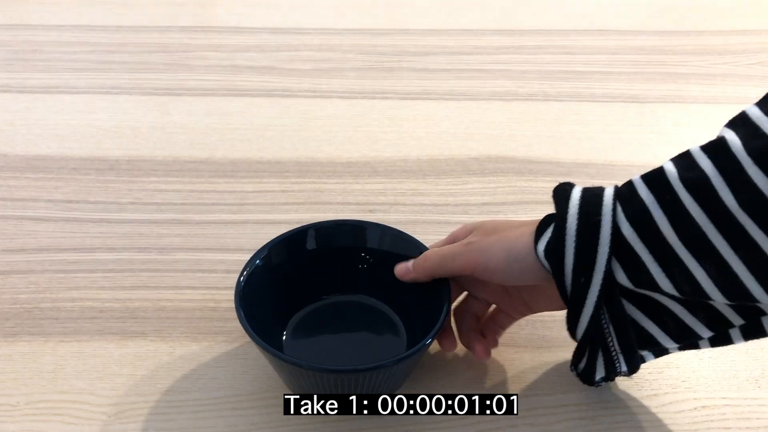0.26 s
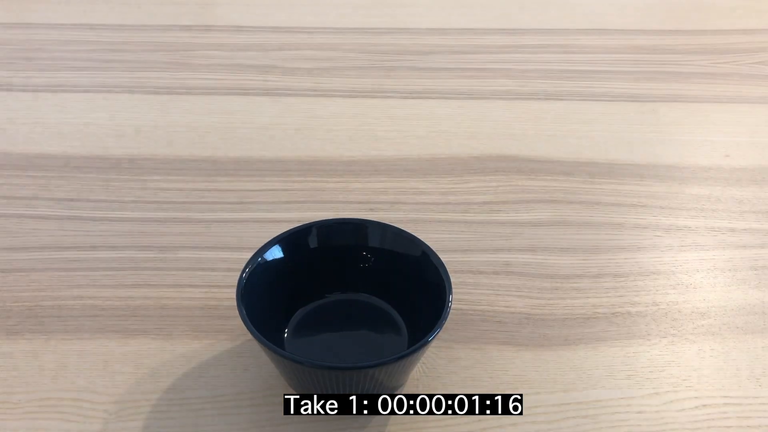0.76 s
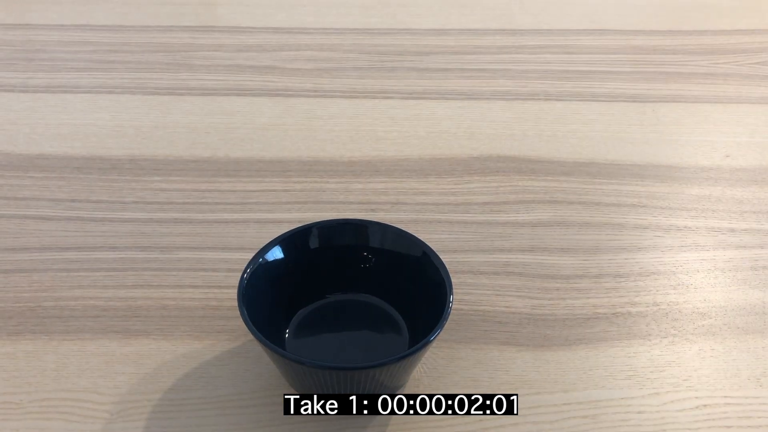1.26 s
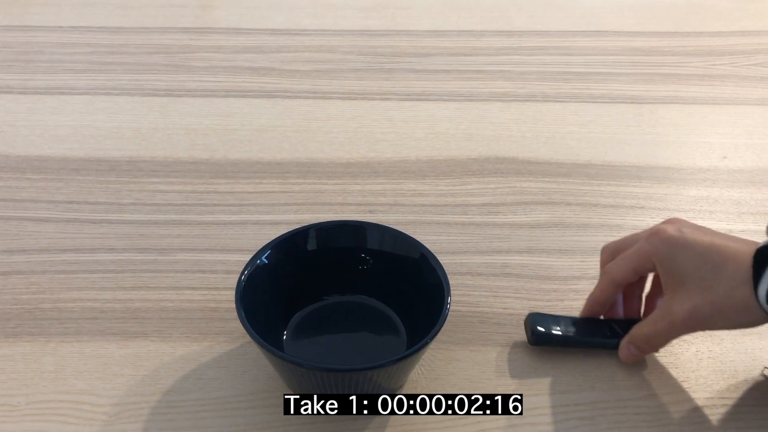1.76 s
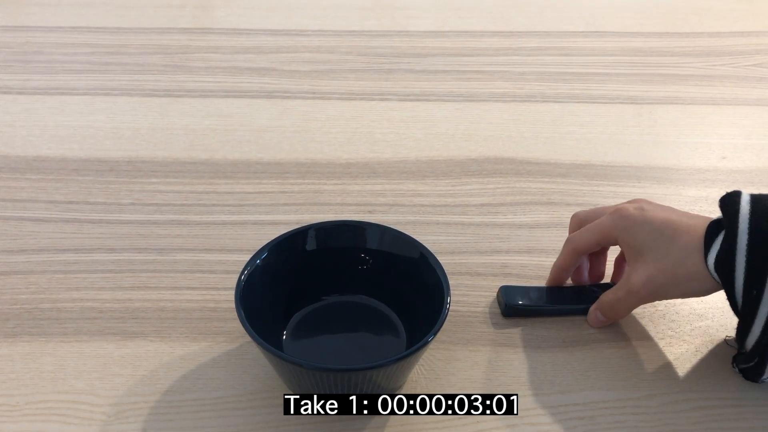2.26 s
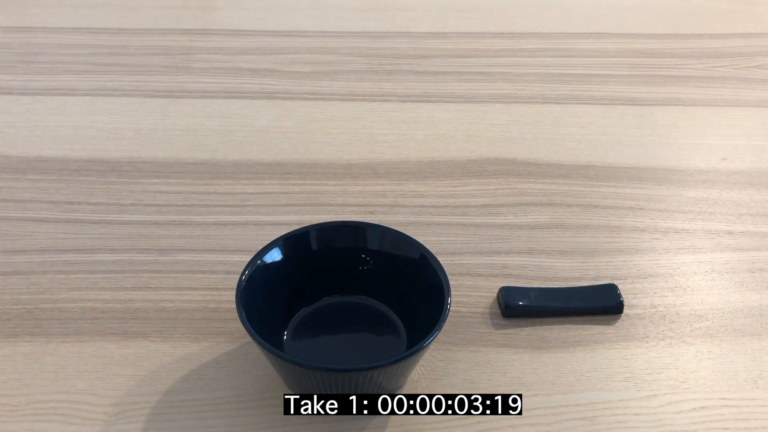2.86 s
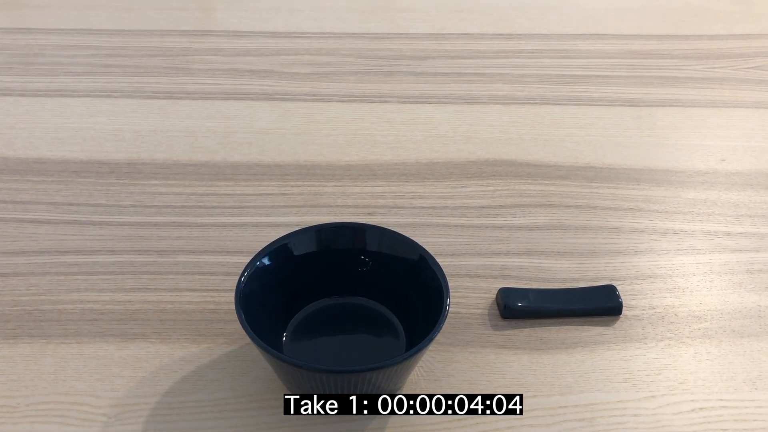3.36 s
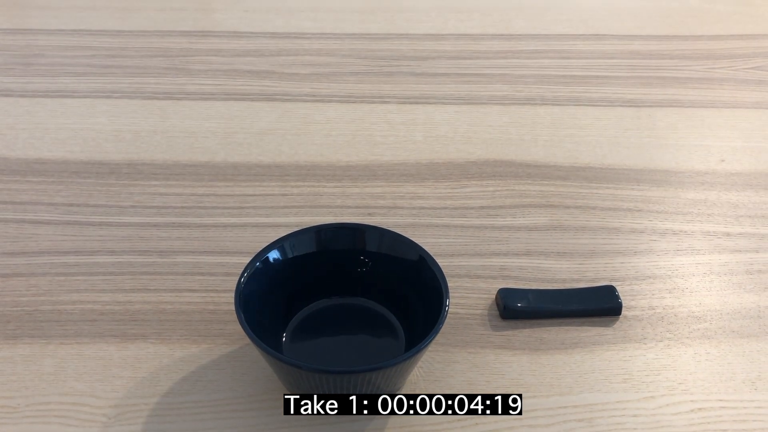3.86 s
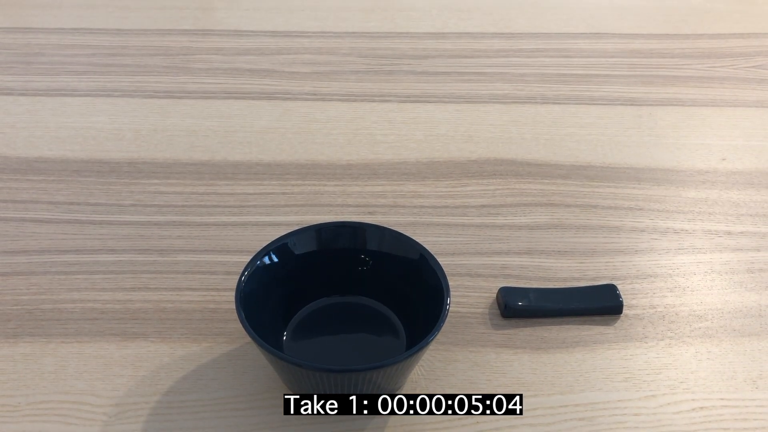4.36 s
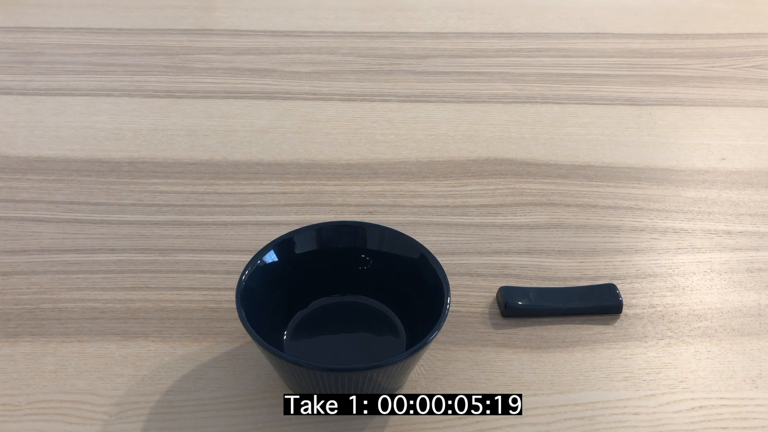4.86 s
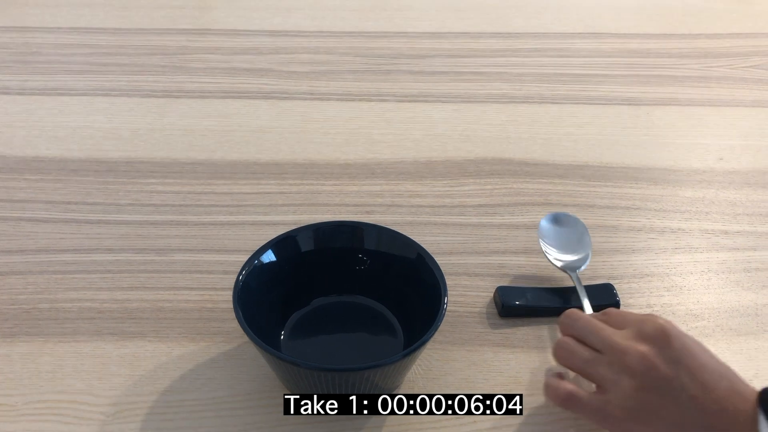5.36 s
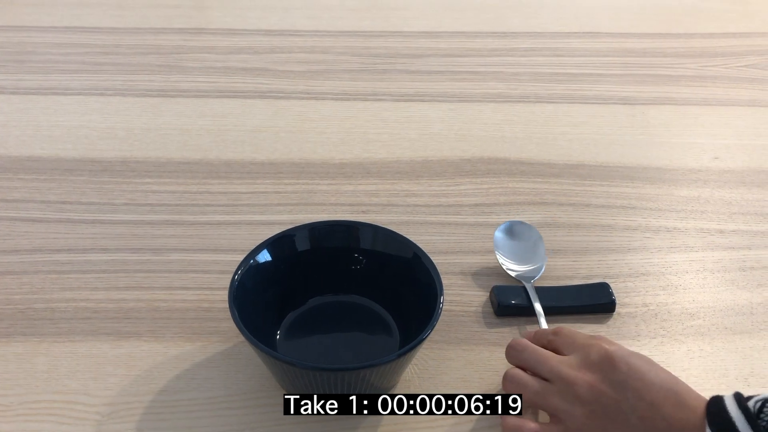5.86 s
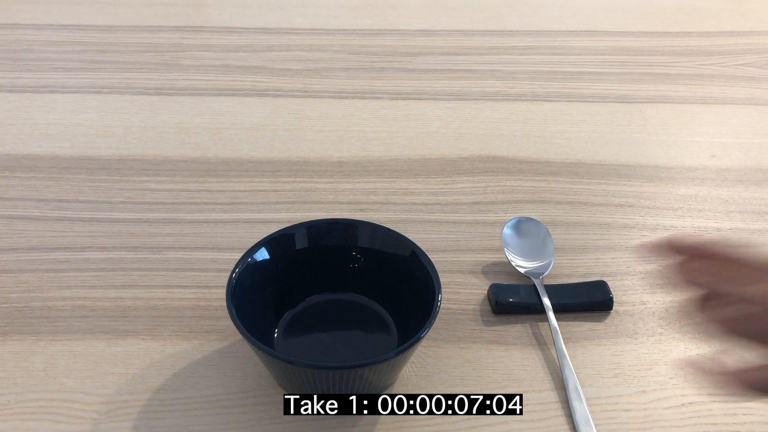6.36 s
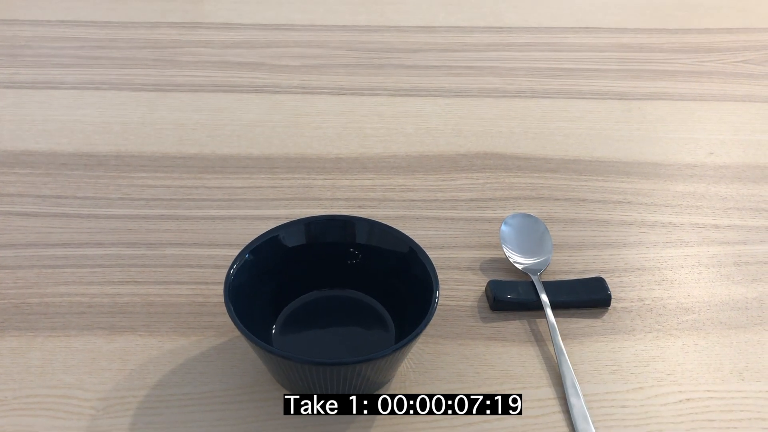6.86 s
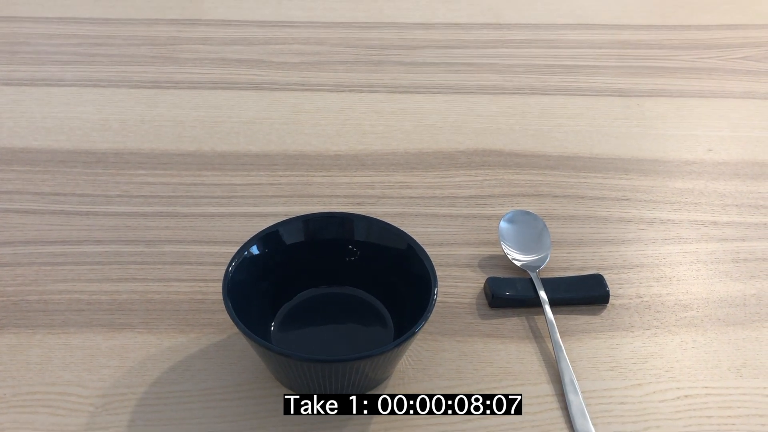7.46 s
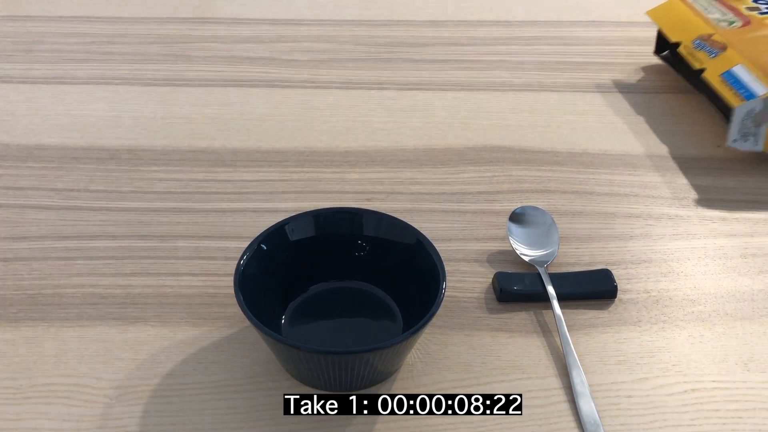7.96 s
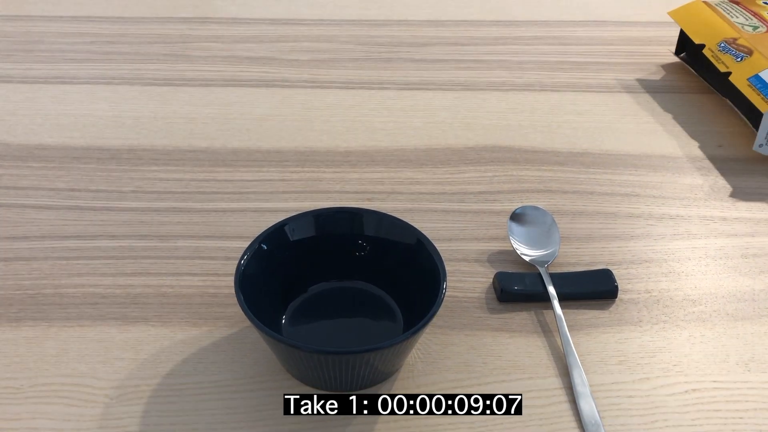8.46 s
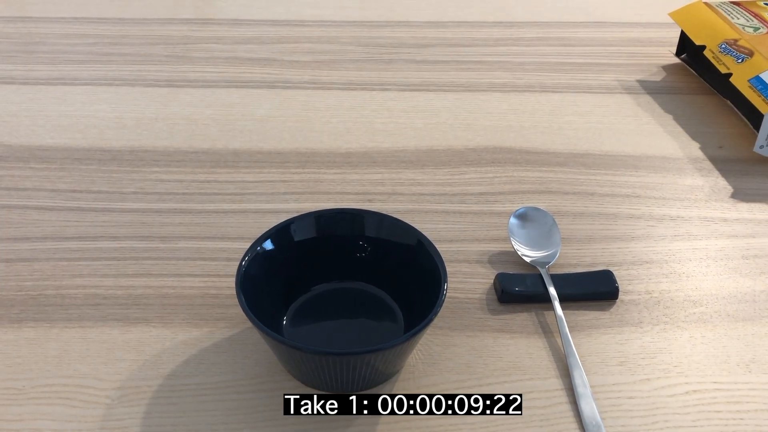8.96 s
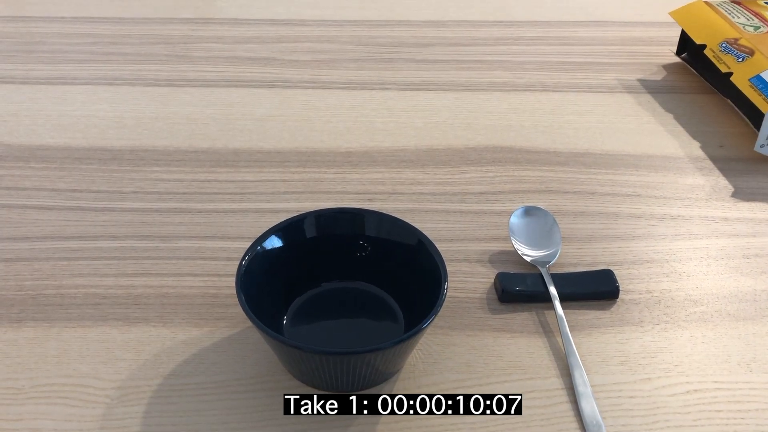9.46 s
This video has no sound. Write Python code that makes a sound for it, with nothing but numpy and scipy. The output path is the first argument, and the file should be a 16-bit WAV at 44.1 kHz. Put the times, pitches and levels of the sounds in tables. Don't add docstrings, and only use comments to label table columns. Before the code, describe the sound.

Tableware is set down on wood in a quiet room, with knocks and steely ticks, followed by cardboard dragging, hollow bumps and sharp bag crackles.

```python
import sys
import numpy as np
from scipy import signal
from scipy.fft import rfft, irfft, next_fast_len
from scipy.io import wavfile
from scipy.ndimage import uniform_filter1d

SR = 44100
rng = np.random.default_rng(int(sys.argv[2]) if len(sys.argv) > 2 else 0)


def volts(x):
    e = np.asarray(x, float) / 20
    return 10 ** e


def digitize_waveform(pressure):
    field = np.atleast_2d(pressure).T
    bounded = np.clip(field, -1, 1)
    quanta = np.round(bounded * 32767).astype(np.int16)
    wavfile.write(sys.argv[1], SR, quanta)


N = 427769
ONSET_S = 0.0008


def lookup(table, hz):
    f, v = np.transpose(table)
    return np.interp(np.log(np.maximum(hz, 1)), np.log(f), v)


def colour(x, table):
    n = next_fast_len(len(x) + 4096)
    gain = volts(lookup(table, np.fft.rfftfreq(8192, 1 / SR)))
    cepstrum = irfft(np.log(gain))[:4096]
    cepstrum[1:] *= 2
    impulse = irfft(np.exp(rfft(cepstrum, 8192)))[:4096]
    return irfft(rfft(x, n) * rfft(impulse, n), n)[:len(x)]


def band(x, lo_hz, hi_hz):
    return signal.lfilter(*signal.butter(2, [lo_hz, min(hi_hz, SR * 0.49)], "band", fs=SR), x)


def unit(x):
    return x / np.sqrt(np.mean(x ** 2))


def fade(t, t60):
    return 10 ** (-3 * t / t60)


def ring(x, modes, spread_db=0.0):
    out = 0
    share = volts(spread_db * rng.standard_normal(len(modes))) * rng.choice([-1, 1], len(modes))
    for (hz, db, t60), g in zip(modes, share):
        pole = np.exp(2j * np.pi * hz / SR) * fade(1 / SR, t60)
        resonance = signal.lfilter([0, pole.imag], [1, -2 * pole.real, abs(pole) ** 2], x)
        out = out + g * volts(db) * resonance
    return out


def cluster(modes):
    out = []
    for hz, db, t60 in modes:
        neighbour_db = db - (10 if hz < 4000 else 3)
        out.append((hz, db, t60))
        for shift in [0.022, 0.007] * rng.standard_normal(2):
            out.append((hz * (1 + shift), neighbour_db, 0.55 * t60))
    return out


def disperse(x, spread):
    phase = 2 * np.pi * spread * np.sqrt(np.fft.rfftfreq(len(x), 1 / SR))
    return irfft(rfft(x) * np.exp(-1j * phase), len(x))


def grains(per_s, spread_db, size=N):
    hits = (rng.random(size) < per_s / SR) * rng.choice([-1, 1], size)
    return unit(hits * volts(spread_db * rng.exponential(1, size)))


def walk(per_s):
    k = int(SR / per_s)
    return unit(uniform_filter1d(np.repeat(rng.standard_normal(N // k + 1), k), k)[:N])


def add(out, s, sound, db):
    i = int((s + ONSET_S) * SR)
    out[i:i + len(sound)] += (volts(db) * sound / np.abs(sound).max())[:N - i]


def curve(table):
    s, *columns = np.transpose(table)
    return [volts(np.interp(np.arange(N) / SR, s, c, -150, -150)) for c in columns]


def strokes(starts, holds, dbs, attack_s, sag_db_s, release_db_s):
    t, power = np.arange(N) / SR, np.zeros(N)
    for s, hold, db in zip(starts, holds, dbs):
        a = int((s - attack_s) * SR)
        age = t[a:a + SR // 2] - s
        fall_db = sag_db_s * np.clip(age, 0, hold) + release_db_s * np.maximum(age - hold, 0)
        rise = np.clip(1 + age / attack_s, 0, 1)
        power[a:a + SR // 2] += (volts(db - fall_db) * rise) ** 2
    return np.sqrt(power)


# frequency in Hz, t60 in seconds.
WOOD_T60 = [(100, 0.74), (260, 0.28), (700, 0.27), (1840, 0.066), (4850, 0.049)]


def knocks(events, tone, top, modes, wood_db, tilt_db, crack_s, top_db, chatter_s, spread):
    out, t = np.zeros(N), np.arange(SR // 2) / SR
    click = 1.0 * (t == 0)
    held = np.exp(-(t / 0.18) ** 4)
    for s, db, ring_db, click_db in events:
        wood = 0
        for hz in 70 * 2 ** np.arange(0, 8, 0.5):
            late = 1 - np.exp(-t * hz / 3.6)
            crack = fade(t, crack_s * (1000 / hz) ** 0.33)
            tail = volts(wood_db - tilt_db * np.log2(hz / 500)) * fade(t, lookup(WOOD_T60, hz))
            noise = band(rng.standard_normal(len(t)), hz / 1.19, hz * 1.19)
            wood = wood + late * (crack + tail) * noise
        table = volts(top_db) * ring(click, top, 3.5)
        add(out, s, colour(volts(click_db) * disperse(click, spread) + wood + table, tone), db)
        chatter = 4 * click + grains(5500, 0.95, size=len(t)) * fade(t, chatter_s)
        body = held * ring(chatter, cluster(modes), 1.2)
        add(out, s, body + 1.5 * band(chatter, 3000, 16000), db + ring_db)
    return out


# start in seconds, peak in dB, ring of the object in dB, hardness of the click in dB.
BOWL_LANDS = [
    (.1204, -15.5, -38, 26.5),
]
BOWL_LANDS_AGAIN = [
    (.3404, -15.5, -29, 23.6),
]
# frequency in Hz, level in dB per Hz.
BOWL_COLOUR = [(35, -49), (60, -22), (174, -1), (474, 0), (1120, -11.5), (1590, -28.5), (2070, -30.5),
               (3390, -32), (4420, -53), (6010, -56), (8000, -66), (10400, -99), (17600, -120)]
# frequency in Hz, level in dB, t60 in seconds.
TABLE_MIDDLE = [(138, -1.5, 0.54), (206.6, -5.5, 0.33), (268, -14, 0.16), (400, -2, 0.18), (536, 0, 0.13)]
TABLE_EDGE = [(141, -8, 0.6), (197, 2, 0.34), (453, -1.5, 0.072), (935, -17, 0.1), (1104, -4, 0.092)]
BOWL_MODES = [(1557, 5, 0.23), (6200, -22, 0.038)]


def bowl():
    first = knocks(BOWL_LANDS, BOWL_COLOUR, TABLE_MIDDLE, BOWL_MODES, wood_db=-3.5, tilt_db=4.0,
                   crack_s=0.079, top_db=-17.0, chatter_s=0.005, spread=0.098)
    again = knocks(BOWL_LANDS_AGAIN, BOWL_COLOUR, TABLE_EDGE, BOWL_MODES, wood_db=-10.0, tilt_db=2.5,
                   crack_s=0.089, top_db=-23.0, chatter_s=0.006, spread=0.104)
    return first + again


# start in seconds, peak in dB, ring of the object in dB, hardness of the click in dB.
REST_LANDS = [
    (1.975, -50.5, -58, -10.5),
    (2.028, -45, -58, -9.5),
    (2.119, -6, -26.5, 24),
    (2.138, -22, -46, 22.5),
    (2.1455, -27, -49, 18),
]
REST_NUDGED = [
    (2.302, -26.5, -45.5, 14),
    (2.309, -30, -52, -12),
    (2.318, -30.5, -60, -15),
    (2.3325, -13, -29, 24),
]
# frequency in Hz, level in dB per Hz.
REST_COLOUR = [(59, -61), (100, -29), (768, -0.5), (1800, 0), (2470, -5.5), (2800, -12), (3250, -6.5),
               (4020, -27), (4470, -20.5), (5650, -26.5), (6840, -28), (16000, -59)]
# frequency in Hz, level in dB, t60 in seconds.
TABLE_BY_REST = [(195, -3.5, 0.17), (415, -2, 0.13), (774, -7.5, 0.076), (988, -4, 0.1), (1220, -7.5, 0.12),
                 (1410, -10.5, 0.077), (1750, -0.5, 0.047), (2360, -4.5, 0.05)]
TABLE_BY_NUDGE = [(202, 4, .15), (386, 2.5, 0.25), (454, 1, .15), (795, -1, .08), (1032, -5.5, 0.14),
                  (1360, -15, .06), (1750, -6.5, 0.087), (3260, -4, .02)]
REST_MODES = [(4430, -5.5, 0.07), (3200, -5, 0.025), (8970, -8, 0.0328)]


def spoon_rest():
    landing = knocks(REST_LANDS, REST_COLOUR, TABLE_BY_REST, REST_MODES, wood_db=-4.5, tilt_db=6.5,
                     crack_s=0.04, top_db=-13.5, chatter_s=0.0026, spread=0.047)
    nudge = knocks(REST_NUDGED, REST_COLOUR, TABLE_BY_NUDGE, REST_MODES, wood_db=1.5, tilt_db=7.0,
                   crack_s=0.035, top_db=-12.5, chatter_s=0.0023, spread=0.0432)
    return landing + nudge


# start in seconds, peak in dB, ring of the object in dB, hardness of the click in dB.
SPOON_LANDS = [
    (5.826, -13, -2.5, 13),
    (5.840, -23, -0.5, 7),
]
SPOON_DROPS = [
    (5.9425, -13, -16, 12),
    (5.9475, -17.5, 0, 6.1),
    (5.964, -27, -13, 5.3),
]
# frequency in Hz, level in dB per Hz.
LAID_COLOUR = [(59, -43), (100, -26.5), (450, -4), (1000, -8.5), (2800, -14.5), (4870, -20.5), (5770, -29),
               (8640, -21), (10000, -16), (11200, -32), (12700, -21), (15000, -15.5), (16000, -33)]
DROPPED_COLOUR = [(59, -44), (100, -34.5), (818, -2.5), (2600, -13), (3800, -9), (5200, -23.5), (8640, -22),
                  (16000, -51)]
# frequency in Hz, level in dB, t60 in seconds.
LAID_MODES = [(1654, -8, 0.055), (3881, -28.5, 0.1), (4830, -1.5, 0.019), (6830, -25, 0.21),
              (7180, -22, 0.031), (7700, -26, 0.12), (8480, -15.5, 0.18), (9400, -24, 0.12),
              (9900, -10, .02), (12270, -8, 0.042), (12750, -13, 0.097), (13940, -27, 0.079),
              (14700, -10, 0.043)]
DROPPED_MODES = [(4250, -24, 0.08), (6550, -16, 0.1), (6944, -23, 0.11), (7500, -15, 0.12),
                 (8240, -18, 0.1), (8680, -7, 0.064), (9082, -26, 0.12), (9500, -23, 0.11),
                 (11200, -23, 0.092), (12750, 3, 0.033), (14850, -9, 0.057)]


def spoon_laid():
    laid = knocks(SPOON_LANDS, LAID_COLOUR, TABLE_MIDDLE, LAID_MODES, wood_db=-19, tilt_db=9.0,
                  crack_s=0.032, top_db=-27.0, chatter_s=0.038, spread=0.074)
    dropped = knocks(SPOON_DROPS, DROPPED_COLOUR, TABLE_EDGE, DROPPED_MODES, wood_db=-14, tilt_db=9.0,
                     crack_s=0.04, top_db=-17.5, chatter_s=0.033, spread=0.061)
    return laid + dropped


# start in seconds, hold in seconds, level in dB.
SETTLING_TOUCHES = [
    (5.835, 0.053, -40.5),
    (6.075, 0.11, -52.5),
]
# frequency in Hz, level in dB, t60 in seconds.
WOBBLE_MODES = [(410, 0, 0.057), (806, 6, 0.0057)]


def spoon_settling():
    level = strokes(*np.transpose(SETTLING_TOUCHES), attack_s=0.011, sag_db_s=23.8, release_db_s=500)
    return level * unit(ring(grains(300, 1.1), WOBBLE_MODES))


# start in seconds, hold in seconds, level in dB.
STEEL_SCRAPES = [
    (3.6735, 0.025, -34.5),
    (3.72, .05, -51),
    (3.767, .01, -44),
    (3.781, .004, -26.5),
    (3.7815, 0.025, -30),
]
STEEL_SLIDES = [
    (3.815, 0.04, -40.5),
    (3.856, 0.033, -38),
    (3.895, 0.044, -44.5),
]
# frequency in Hz, level in dB, t60 in seconds.
HELD_MODES = [(1015, -19, 0.041), (1300, -17, 0.04), (1700, -13, 0.1), (2566, -24, .1), (4050, -4, 0.07),
              (4400, -9, .04), (4861, -3, 0.08), (5131, -4, 0.06), (5475, -14, .05), (6720, -9, 0.09),
              (6939, -8, 0.2), (7763, -8, 0.1), (8511, -6, .12), (9420, -10, .08), (10230, -7, .085),
              (10700, -13, .1), (11320, -2, 0.12), (12200, -10, .08), (12870, -2, .1), (13150, -5, 0.082),
              (14080, -3, .11), (14960, 3, 0.07)]
# frequency in Hz, width in Hz, level in dB.
SLIDING_MODES = [(1730, 20, -1), (3330, 49, -7), (4020, 30, 0), (5100, 28, -7), (6960, 88, -3.5),
                 (7800, 45, -10.5), (8840, 120, -5), (9700, 95, -10), (10300, 39, -16), (10500, 37, -14),
                 (11200, 29, -24), (11700, 41, -18), (12200, 47, -17), (13000, 41, -4), (14000, 75, -9),
                 (15100, 160, -16)]


def spoon_scraped():
    out = np.zeros(N)
    a, b = int(3.6 * SR), int(4.2 * SR)
    finger_damping = 0.59
    held = [(hz, db, t60 * finger_damping) for hz, db, t60 in HELD_MODES]
    sliding = [(hz, db + 10 * np.log10(width / 30), 2.6 / width) for hz, width, db in SLIDING_MODES]
    choke = volts(-500 * np.maximum(np.arange(a, b) / SR - 3.922, 0))
    for events, modes, ring_db, buzz_db in ((STEEL_SCRAPES, held, -40.5, -8.0), (STEEL_SLIDES, sliding, -41.0, -9.0)):
        level = strokes(*np.transpose(events), attack_s=0.00055, sag_db_s=56, release_db_s=603)[a:b]
        for hz, db, t60 in modes:
            catches = grains(6000, 1.6, size=b - a) * level
            out[a:b] += choke * volts(ring_db) * ring(catches, cluster([(hz, db, t60)])) / np.sqrt(t60)
        buzz = unit(band(grains(9000, 1.5, size=b - a), 2910, 15500))
        out[a:b] += volts(buzz_db) * level * buzz
    return out


ROCKING_TICKS = [3.9388, 3.978, 4.018, 4.0509, 4.082, 4.111, 4.1394, 4.171, 4.196, 4.2434, 4.2787, 4.324,
                 4.343, 4.385, 4.426]
# frequency in Hz, level in dB, t60 in seconds.
ROCKING_MODES = [(3418, -5, 0.068), (6670, -15, 0.074), (6950, -8, 0.08), (7800, -22, .05),
                 (9600, -17, .09), (10293, -12, 0.1), (11526, -16, 0.11)]
HARD_LANDING_MODES = [(1244, -8.5, 0.041), (1730, -6, 0.058), (2610, -5, 0.057), (4045, -8, 0.06),
                      (4490, 2.5, 0.017), (5443, -9, 0.03), (5900, -6, 0.022)]


def spoon_rocking():
    out, touch, t = np.zeros(N), np.zeros(N), np.arange(SR // 2) / SR
    a, b = int(3.6 * SR), int(4.9 * SR)
    first_s = ROCKING_TICKS[0]
    for k, s in enumerate(ROCKING_TICKS):
        swing_db = (-1) ** k
        db = -47.5 - 28.5 * (s - first_s) - swing_db
        tick = 3.9 * (t == 0) + grains(6900, 2.2, size=len(t)) * fade(t, 0.085)
        add(touch, s, tick, db)
    touch = touch[a:b]
    out[a:b] += volts(-15.0) * (ring(touch, ROCKING_MODES) + 5 * band(touch, 2500, 12000))
    hardness = volts(-14 * (np.arange(a, b) / SR - first_s))
    out[a:b] += volts(-12.5) * ring(hardness * touch, HARD_LANDING_MODES)
    return out


# time in seconds, level in dB.
HANDLE_SWELL = [(3.95, -85), (4.1, -82), (4.26, -58.5), (4.33, -77), (4.39, -66), (4.5, -76), (4.72, -81)]
# start in seconds, peak in dB.
HANDLE_STRUCK = [
    (5.831, -43.5),
    (5.952, -40.5),
]


def spoon_handle():
    handle_hz, handle_t60_s = 3418, 0.65
    out, t = np.zeros(N), np.arange(SR // 2) / SR
    for s, db in HANDLE_STRUCK:
        push = np.exp(-t / 0.0046) * np.sin(2 * np.pi * handle_hz * t)
        choke = np.exp(-(t / 0.11) ** 4)
        add(out, s, ring(push, [(handle_hz, 0, handle_t60_s)]) * choke, db)
    phase = 2 * np.pi * handle_hz * np.arange(N) / SR + 0.5 * walk(30)
    return out + curve(HANDLE_SWELL)[0] * volts(-4.0) * np.sin(phase)


# start in seconds, hold in seconds, rub in dB,
# weight in dB (more boom, less hiss).
BOX_STROKES = [(7.021, 0.056, -43.5, -1.5), (7.115, 0.036, -47, 4), (7.19, 0.17, -58.5, -1),
               (7.294, 0.043, -49.5, -6), (7.367, 0.008, -45, -6.5), (7.48, 0.082, -67, -27),
               (7.544, 0.066, -34.5, -9), (7.64, 0.07, -37.5, -2), (7.684, 0.021, -33, -4.5),
               (7.722, 0.024, -41.5, 5), (7.76, 0.042, -40, -1), (7.812, 0.13, -37.5, -2),
               (7.931, 0.076, -47.5, 9), (7.99, 0.18, -59, 16), (8.126, 0.095, -44.5, 5.5),
               (8.277, 0.07, -46, -4.5), (8.449, 0.1, -46, -1.5), (8.6, 0.21, -58.5, -7),
               (8.816, 0.18, -39.5, -4), (8.984, 0.27, -40.5, -7.5), (9.173, 0.066, -36, -7),
               (9.29, 0.12, -44, -9), (9.441, 0.19, -48.5, -4.5), (9.6, 0.036, -43, -5),
               (9.67, .03, -42.5, 0)]
# frequency in Hz, level in dB per Hz.
RUB_COLOUR = [(15, -82), (30, -26.5), (128, -2.5), (262, 2), (330, -9.5), (1150, -12), (2000, -17),
              (3060, -20), (6000, -23), (12600, -30), (15200, -35), (16500, -66)]
# time in seconds, level in dB.
TABLE_HEAVE = [(7.5, -87), (7.85, -59), (7.95, -46), (8.72, -78), (8.84, -54.5), (9.7, -56.5)]


def box_dragged():
    at, hold, rub_db, weight_db = np.transpose(BOX_STROKES)

    def level(db):
        return strokes(at, hold, db, attack_s=0.0095, sag_db_s=6.5, release_db_s=302)

    rub, boom = level(rub_db), level(rub_db + weight_db)
    hiss = level(rub_db - 15 - 0.65 * weight_db)
    slip = colour(rng.standard_normal(N) + 1.2 * grains(800, 2.1), RUB_COLOUR)
    rub_judder, boom_judder = volts(1.2 * walk(70)), volts(1.2 * walk(40))
    clumps = 0
    for k in range(6):
        lo_hz, hi_hz = 350 * 1.534 ** k, 537 * 1.534 ** k
        clumps = clumps + (-1) ** k * volts(3.3 * walk(55)) * band(slip, lo_hz, hi_hz)
    out = rub_judder * (rub * unit(clumps) + hiss * unit(band(slip, 4560, 18000)))
    out -= boom * boom_judder * unit(band(band(slip, 171, 435), 140, 400))
    out -= curve(TABLE_HEAVE)[0] * unit(band(slip, 27, 104)) * volts(4.5)
    fine = band(grains(1400, 2.6), 2100, 15500) * (np.arange(N) > 8.81 * SR)
    return out + volts(-10.5) * rub * fine


# start in seconds, peak in dB, panel frequency in Hz, table boom in dB.
BOX_BUMPS = [(7.119, -35, 491, -19.5), (7.301, -33.5, 495, -15), (7.319, -30.5, 483, -31),
             (7.369, -39, 386, -23), (7.393, -41, 486, -20), (7.561, -25.5, 275, -18),
             (7.601, -19.5, 244, -13), (7.718, -23, 266, -9.5), (7.944, -20, 364, -4),
             (7.954, -20, 242, -12.5), (8.124, -28, 369, -2.5), (8.192, -36, 420, -4.5),
             (8.811, -25.5, 245, -7), (9.057, -42, 390, -11)]
# pitch ratio, level in dB, t60 in seconds.
PANEL_NEIGHBOURS = [(1, 0.5, 0.028), (1, -2.5, 0.075), (0.8, -20.5, 0.17)]
# start in seconds, peak in dB.
FACE_SLAPS = [
    (7.941, -21.5),
    (8.123, -23.5),
    (9.379, -31),
]


def box_bumped():
    out, t = np.zeros(N), np.arange(SR // 2) / SR
    push = np.diff(np.hanning(int(0.0021 * SR)), append=np.zeros(len(t)))
    for s, db, hz, table_db in BOX_BUMPS:
        panels = [(hz * ratio, *rest) for ratio, *rest in PANEL_NEIGHBOURS]
        add(out, s, ring(push, panels + [(hz, 0, 0.07)]), db)
        add(out, s, ring(push, [(138.8, 0, 1)]), db + table_db - 5.5)
    t = t[:SR // 12]
    for s, db in FACE_SLAPS:
        slap = disperse(grains(3000, 3.0, size=len(t)) * fade(t, 0.0046), 0.38)
        add(out, s, band(slap, 280, 2230), db)
    return out


# start in seconds, peak in dB, centre in Hz, top octave in dB,
# low knock in dB.
FLAP_CREASES = [(7.9396, -23, 3200, -21, 1.5), (7.9722, -19.5, 2900, -13, -12), (8.09, -39, 1460, -12, 3.5),
                (8.1232, -20, 2720, -21, -5), (8.189, -29.5, 1370, -15, -2.5), (8.2405, -35, 1370, -12, 0),
                (8.2793, -21.5, 2980, -13, -13), (8.287, -16.5, 3700, -23, -24),
                (8.332, -35, 1610, -24, -7), (8.3464, -41.5, 1360, -23, 3.5), (8.4005, -33, 2140, -22, -8),
                (8.4155, -15, 4540, -25, -22), (8.434, -22.5, 5300, -15, -23),
                (8.4475, -31, 3000, -13, -10.5), (8.4855, -28, 5780, -13, -24), (8.4902, -6, 5500, -5, -26),
                (8.534, -14, 1390, -18, -21), (8.6254, -22.5, 1450, -20, -18), (8.664, -15, 1880, -11, -29),
                (8.7483, -23, 2980, -21, -41), (8.7804, -33, 1750, -25, -9), (8.811, -33, 4170, -13, -6)]
BAG_CRACKLES = [(8.8189, -12, 3750, -12, -35), (8.8327, -24, 4100, -21, -15), (8.85, -20, 2170, -16, -14),
                (8.8662, -32, 1220, -21, -4), (8.8867, -15.5, 4440, -21, -24),
                (8.904, -12.5, 2820, -12, -14), (8.9123, -13, 1560, -23, -17), (8.916, -19, 4130, -30, -13),
                (8.982, -22, 1310, -12, -24), (8.9933, -22, 5720, -2.5, -9),
                (9.0064, -17.5, 2720, -15, -28), (9.0568, -15, 1610, -10, -9.5),
                (9.0621, -19, 1880, -11, -9.5), (9.0694, -26, 2230, -4, -18), (9.0834, -11, 2130, -16, -48),
                (9.0994, -25, 5960, -18, -30), (9.1194, -22.5, 1410, -20, -10),
                (9.1587, -29, 1430, -13, -3), (9.1731, -15, 2790, -15, -34), (9.181, -20.5, 4660, -17, -24),
                (9.1864, -21, 1220, -23, -13), (9.204, -14.5, 2620, -20, -16),
                (9.217, -19.5, 2890, -2, -10.5), (9.2225, -14, 1340, -6, -18),
                (9.2316, -18.5, 1190, -20, -14), (9.256, -26, 1260, -10, -20),
                (9.357, -25.5, 2120, -22, -24), (9.3795, -24, 4400, -9, -27), (9.3859, -24, 2950, -14, -14),
                (9.4413, -33, 3370, -16, -16), (9.475, -30, 1200, -12, -11),
                (9.5256, -17.5, 3880, -14, -17), (9.5711, -28, 1580, -11, -11),
                (9.5837, -17.5, 1500, -20, -12.5), (9.6202, -25, 1280, -16, -11),
                (9.6523, -8.5, 4430, -18, -26), (9.671, -32, 1730, -13, -20),
                (9.6798, -9, 1410, -11.5, -37), (9.6892, -14, 5330, -9, -15),
                (9.6944, -8, 5070, -26, -16.5)]
# start in seconds, peak in dB, centre in Hz.
FILM_TICKS = [(7.8313, -26.5, 2970), (7.835, -31, 1670), (8.9653, -30, 6500), (9.0884, -20, 1900),
              (9.1624, -29, 4000), (9.1689, -36, 6000), (9.1948, -25, 2730), (9.2944, -40, 7000),
              (9.41, -34, 1300), (9.461, -37, 1500), (9.4678, -30, 1720), (9.4924, -38, 4000),
              (9.5759, -35, 5000), (9.634, -37, 5000), (7.213, -45, 3000), (9.6585, -22, 5300)]


def box_opened():
    out, t = np.zeros(N), np.arange(SR // 12) / SR
    sheen_db, knock_db = 9, 7.5
    ticks = [(*tick, -16, -24) for tick in FILM_TICKS]
    for s, db, hz, top_db, low_db in FLAP_CREASES + BAG_CRACKLES + ticks:
        s = s - ONSET_S
        snap = (t == 0) + 0.48 * grains(5000, 0.55, size=len(t)) * fade(t, 0.01)
        rustle = 0.067 * rng.standard_normal(len(t)) * fade(t, 0.11)
        pitch = band(snap, hz / 1.29, hz * 1.25)
        add(out, s, pitch + 0.77 * band(snap + 1.43 * rustle, 1070, 7000), db)
        add(out, s, band(snap + 1.2 * rustle * fade(t, 0.13), 4500, 16800), db + top_db + sheen_db)
        add(out, s, band(snap + rustle, 520, 1640), db + low_db + knock_db)
    return out


# start in seconds, peak in dB, length in seconds.
SLEEVE_PUFFS = [(1.967, -54, 0.099), (2.014, -58, 0.023), (2.387, -51.5, 0.088), (2.541, -55.5, 0.044),
                (2.644, -54.5, 0.075), (2.701, -53, 0.054), (3.088, -51.5, 0.026), (3.204, -49, 0.03),
                (3.391, -51, 0.027), (4.422, -53, 0.083), (4.51, -44, 0.025), (6.256, -57, 0.023),
                (6.317, -51, 0.027)]
# frequency in Hz, level in dB per Hz.
CLOTH_COLOUR = [(290, -31.5), (500, 2), (1870, -0.5), (2360, -5.5), (3060, -2.5), (11100, -10),
                (16000, -16.5)]


def sleeves():
    out, cloth = np.zeros(N), colour(rng.standard_normal(N), CLOTH_COLOUR)
    for s, db, length in SLEEVE_PUFFS:
        n = int(2 * length * SR)
        rise = np.minimum(np.arange(n) / (0.0024 * SR), 1)
        fall = np.hanning(2 * n)[n:]
        add(out, s, cloth[int(s * SR):][:n] * rise * fall, db - 0.5)
    return out


# time in seconds, level in dB.
SQUEAK_SWELL = [(0.312, -77), (0.33, -55.5), (0.356, -67), (0.38, -95)]


def bowl_squeak():
    modes = [(6080, -10, 0.074), (1483, -5, 0.064)]  # Hz, dB, t60 s
    return curve(SQUEAK_SWELL)[0] * unit(ring(rng.standard_normal(N), modes))


def room_echo(dry):
    t, split_hz = np.arange(SR // 2) / SR, 5084
    after_gap = t > 0.004
    walls = band(rng.standard_normal(len(t)), 196.0, split_hz) * fade(t, 0.33) * after_gap
    walls += volts(-5.5) * band(rng.standard_normal(len(t)), split_hz, 17000) * fade(t, 0.31) * after_gap
    return volts(-17) * signal.fftconvolve(dry, walls / np.linalg.norm(walls))[:N]


# frequency in Hz, level in dB per Hz.
AIR_COLOUR = [(12, -61.5), (30, -13), (50, -12.5), (90, -5), (120, 1.5), (150, -5), (230, -5), (260, -9),
              (520, -15), (750, -20), (1240, -22.5), (1650, -27), (15200, -36.5), (16500, -62)]
# frequency in Hz, level in dB rms.
FAN_LINES = [(59.4, -70.5), (119, -62), (225, -73)]


def room_noise():
    out = volts(-59.5 + 0.5 * walk(2.0)) * unit(colour(rng.standard_normal(N), AIR_COLOUR))
    turns = 2 * np.pi * np.arange(N) / SR
    for hz, db in FAN_LINES:
        out += volts(db + 3.5 + 1.3 * walk(8.3)) * np.sin(hz * turns + 0.54 * walk(7.4))
    return out


def scene():
    dry = bowl() + spoon_rest() + spoon_laid() + spoon_settling()
    dry += spoon_scraped() + spoon_rocking() + spoon_handle()
    dry += box_dragged() + box_bumped() + box_opened()
    dry += sleeves() + bowl_squeak()
    return (dry + room_echo(dry) + room_noise())[None]


def top_cut(x):
    return signal.sosfilt(signal.butter(12, 16980, fs=SR, output="sos"), x)


def record(dry):
    mic_top_hz, air_top_hz = 15910, 16950
    top_band = signal.ellip(6, 0.5, 70, [15900, air_top_hz], "band", fs=SR, output="sos")
    top = signal.sosfilt(top_band, dry)
    power_now = uniform_filter1d(top ** 2, size=128)
    power_around = uniform_filter1d(top ** 2, size=2048)
    sharp = power_now > volts(2 * 12) * power_around / 2
    gate = np.minimum(uniform_filter1d(4.0 * sharp, size=128), 1)
    body = signal.sosfilt(signal.ellip(10, 1, 70, mic_top_hz, fs=SR, output="sos"), dry)
    mix = body + volts(-10.5) * gate * top
    mix = signal.sosfilt(signal.ellip(10, 0.5, 80, air_top_hz, fs=SR, output="sos"), mix)
    return top_cut(mix)


dry = scene()
out = record(dry)
digitize_waveform(out)
```